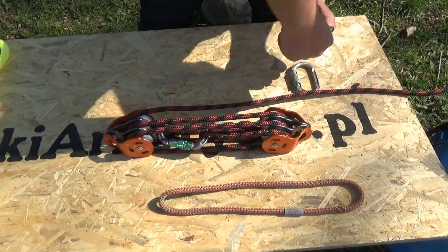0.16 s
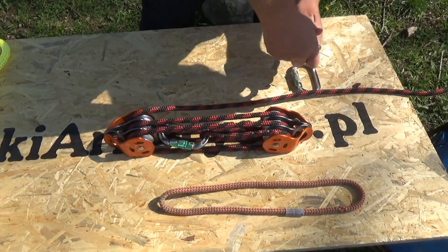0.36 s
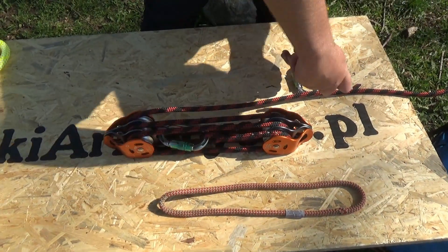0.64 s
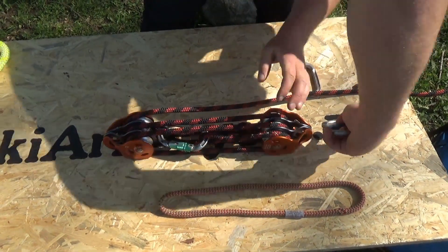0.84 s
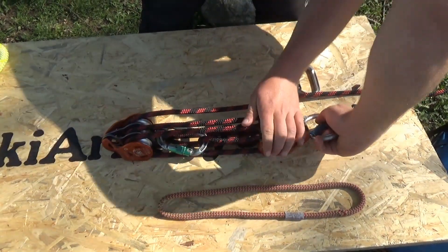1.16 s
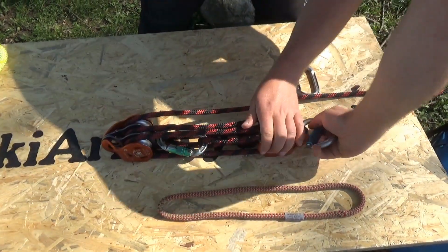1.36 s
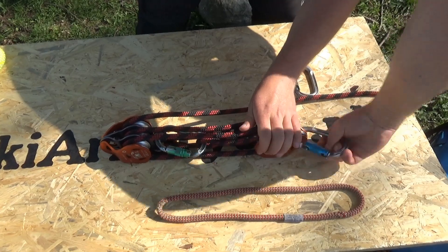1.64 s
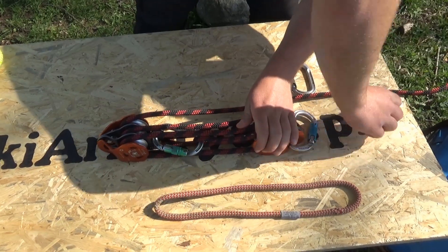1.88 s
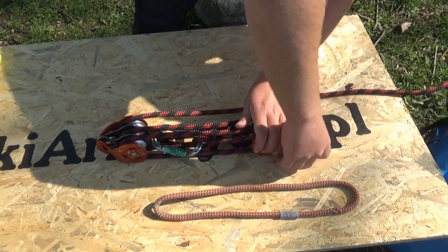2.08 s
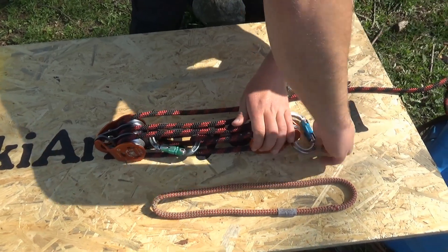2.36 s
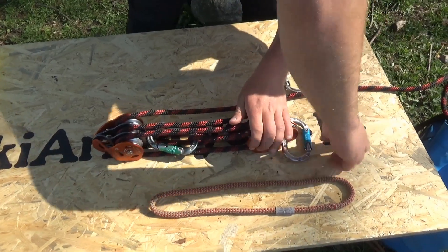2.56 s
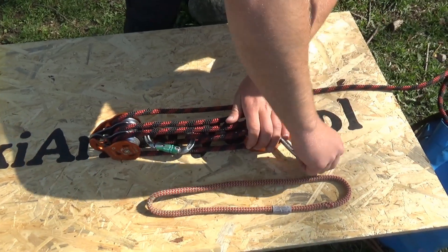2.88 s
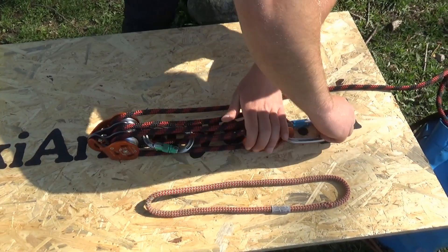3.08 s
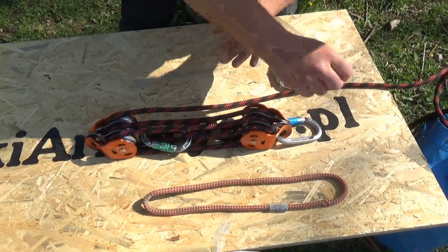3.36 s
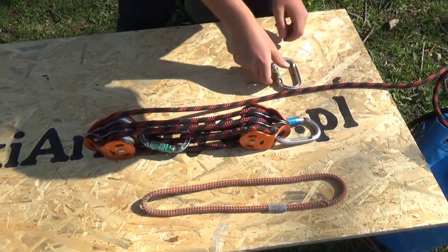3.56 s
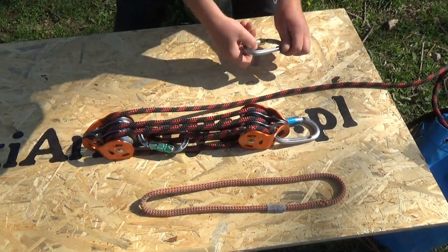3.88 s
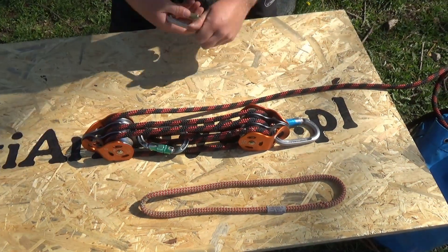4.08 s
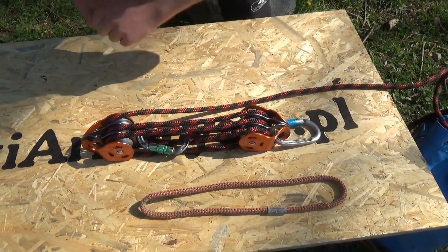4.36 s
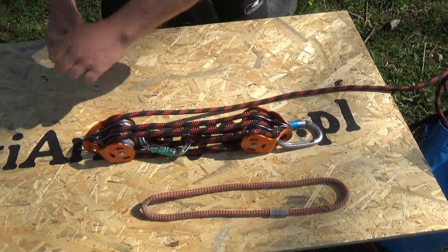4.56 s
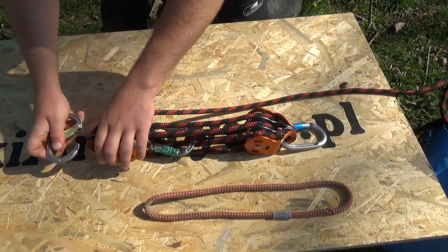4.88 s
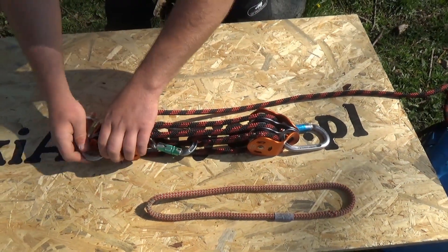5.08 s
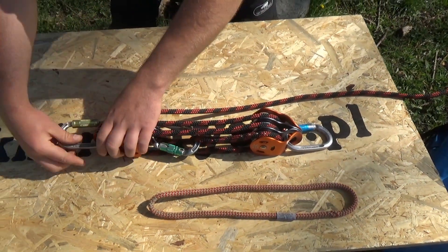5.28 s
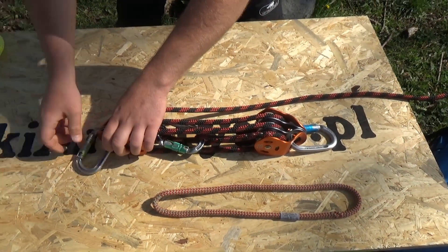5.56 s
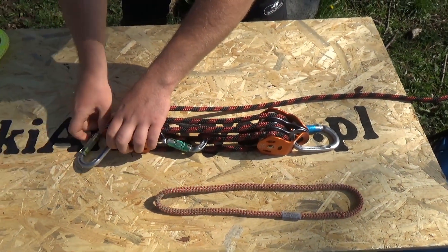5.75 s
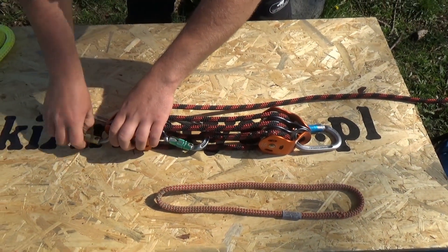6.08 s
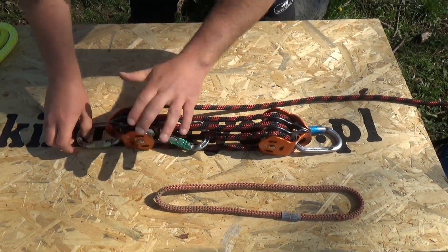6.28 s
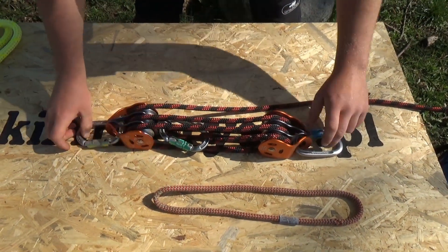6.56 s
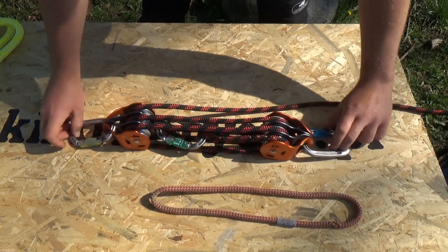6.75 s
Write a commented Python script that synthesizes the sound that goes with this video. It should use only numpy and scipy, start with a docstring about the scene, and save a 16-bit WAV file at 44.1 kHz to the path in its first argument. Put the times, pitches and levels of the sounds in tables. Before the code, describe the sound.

Aluminium carabiners clink and rattle close to the microphone as they are clipped into rope pulleys on a chipboard sheet. After a couple of light snaps comes a busy run of short ringing clicks, woody knocks and gritty scrapes, then a brief lull and a second busy run. Behind it lies a quiet garden with distant hiss, a few faint sparrow chirps and low puffs of wind on the microphone.

```python
"""Two aluminium carabiners clink and scrape as hands clip them into rope pulleys on a chipboard sheet.
Each clink is a rattling crack with a short metal ring; held in the air, it is damped and the gate snaps.
Bumps ring the board with a woody knock, and grit under the sliding gear makes it rumble.
Behind them is a garden: distant hiss, hoarse sparrows, one thin falling whistle,
and wind buffeting the microphone in low puffs."""
import sys
import numpy as np
from scipy import signal
from scipy.fft import rfft, irfft
from scipy.io import wavfile
from scipy.ndimage import uniform_filter1d

SR = 44100
rng = np.random.default_rng(int(sys.argv[2]) if len(sys.argv) > 2 else 0)


def to_wav(sig):
    """Store sig (one row per channel, or 1-D mono) as 16-bit WAV at the path in sys.argv[1].

    Samples outside -1..1 are clipped; the rate is SR.
    """
    pcm = np.clip(np.atleast_2d(sig), -1, 1) * 32767
    pcm = np.round(pcm).astype(np.int16)
    wavfile.write(sys.argv[1], SR, pcm.T)  # frames by channels


N = 305172
TIME = np.arange(N) / SR

# tone of the garden bed: (frequency [Hz], relative level [dB])
GARDEN_SPECTRUM = [(100, -10), (300, 2), (700, 1), (1600, -6), (4000, -4.5), (10000, -11.5), (16000, -19)]
# wind gusts: (peak time [s], level [dB], fade on either side [s])
GUSTS = [(.82, -45, 0.037), (3.55, -48.5, 0.55), (4.098, -32.5, 0.021), (4.598, -44, 0.065),
         (6.1, -44, 0.45), (6.46, -35.5, 0.034)]
# gear dragged over the board or through the fingers:
# (start [s], length [s], metal scrape level [dB], board rumble level [dB])
SLIDES = [(0.103, 0.27, -56, -72), (0.388, 0.1, -58.5, -85), (1.737, 0.15, -45.5, -39),
          (1.781, 0.28, -51.5, -42.5), (2.123, 0.6, -54, -44), (2.422, 0.43, -60.5, -36.5),
          (2.885, 0.2, -54.5, -36.5), (2.966, 0.056, -42.5, -38.5), (3.202, 0.28, -72, -38.5),
          (3.533, 0.19, -58.5, -80), (4.024, 1, -61, -69.5), (5.119, 0.44, -61, -49),
          (5.377, 0.24, -52.5, -51), (5.576, 0.11, -95, -46), (5.78, 0.061, -60.5, -42.5),
          (5.963, 0.16, -58, -40), (6.019, 0.11, -44, -53), (6.086, 0.07, -37.5, -41.5),
          (6.176, 0.51, -68, -50), (6.746, 0.19, -59, -38)]
# carabiner modes before the grip alters them: (frequency [Hz], bandwidth [Hz], relative level [dB])
CARABINER_MODES = [(2100, 90, -7), (2700, 60, -10), (3650, 70, -8), (4170, 55, -4), (5240, 70, -2),
                   (6410, 50, -7), (8250, 40, -12), (9600, 60, -3), (12200, 35, -24), (13550, 45, -27)]
# chipboard modes before the load alters them: (frequency [Hz], bandwidth [Hz], relative level [dB])
BOARD_MODES = [(208.5, 30, 1), (373, 10, -7.5), (479, 48.3, 8.5), (674, 42.4, 6.5), (1094, 99, 3),
               (1441, 62, 4)]
# metal-on-metal hits: (time [s], peak level [dB], brightest pitch [Hz])
CLINKS = [(0.16, -17, 3520), (0.3694, -9, 10870), (0.41, -35, 10200), (1.1394, -9.5, 5070),
          (1.2664, -7.5, 6300), (1.486, -11.5, 5820), (1.5497, -20, 2680), (1.5776, -9, 8600),
          (1.598, -11, 8200), (1.609, -9, 9130), (1.6164, -14.5, 7120), (1.649, -12, 5570),
          (1.68, -12.5, 5280), (1.75, -19.5, 2410), (1.879, -12, 10000), (1.8852, -7.5, 11980),
          (1.91, -11.5, 7130), (1.978, -11.5, 6250), (2.018, -20.5, 3650), (2.071, -16.5, 3720),
          (2.2483, -13.5, 5810), (2.35, -7.5, 9550), (2.58, -13, 5040), (2.915, -14, 6140),
          (2.9422, -7, 4300), (2.971, -12, 9700), (2.9846, -18, 6400), (3.045, -9, 2160),
          (3.235, -11.5, 4950), (3.2828, -12.5, 9320), (3.333, -19, 4900), (4.5534, -16.5, 2620),
          (4.5737, -24.5, 2500), (4.647, -19.5, 9200), (4.6689, -10.5, 3154), (4.786, -35, 2680),
          (5.135, -11.5, 4750), (5.152, -13, 4400), (5.168, -9, 3990), (5.2019, -10, 8220),
          (5.243, -5.5, 4630), (5.265, -23, 4770), (5.3413, -5.5, 5730), (5.3545, -18.5, 11600),
          (5.356, -15, 13500), (5.378, -9.5, 8270), (5.4162, -11, 5920), (5.455, -13.5, 5180),
          (5.4984, -8, 2830), (5.5189, -13, 12550), (5.5303, -14, 5040), (5.587, -6.5, 4940),
          (5.616, -14, 8430), (5.6338, -19.5, 6070), (5.657, -19, 4760), (5.69, -22.5, 5050),
          (5.782, -33.5, 3630), (5.976, -16, 4970), (6.03, -9, 9900), (6.092, -10, 3820),
          (6.0993, -6, 9400), (6.1422, -7, 5440), (6.2639, -17, 4050), (6.311, -8, 9420),
          (6.357, -21, 4380), (6.7732, -18.5, 3500), (6.794, -13, 9500), (6.8, -6, 5200),
          (6.806, -15, 8200)]
# spans with the carabiner held in the air: (start [s], end [s])
IN_AIR = [(0, 1), (4, 5)]
# glide of the thin whistle: (time [s], pitch [Hz])
WHISTLE_GLIDE = [(.2, 13000), (.245, 10900), (.33, 9900)]
# contour of one chirp: (time from its anchor [s], pitch [Hz], relative level [dB])
CHIRP_SHAPE = [(-.035, 6800, -12), (0, 6600, 0), (.011, 4200, -2), (0.03, 4600, 3), (.07, 4200, 0),
               (0.104, 3700, -20)]
# sparrow calls, the lowest from a second, deeper bird: (anchor time [s], level [dB], pitch [ratio])
CHIRPS = [(0.513, -44.5, 0.94), (.575, -51.5, 0.7), (0.89, -42.5, 0.96), (2.654, -41, 0.96),
          (3.254, -37, 0.93), (3.404, -42.5, 0.91), (4.267, -41, 0.96), (5.793, -41, 0.94),
          (6.643, -41, 0.97)]
# gear dropped or bumped on the board: (time [s], peak level [dB])
KNOCKS = [(1.141, -18.5), (1.196, -16), (1.487, -17), (1.8594, -6.5), (1.879, -16.5), (1.938, -18),
          (1.958, -29), (1.975, -9), (2.016, -13.5), (2.07, -11), (2.238, -16), (2.3437, -13),
          (2.45, -17.5), (2.974, -17), (3.129, -10.5), (3.211, -17.5), (3.734, -26.5), (3.841, -18.5),
          (5.498, -9), (5.52, -10.5), (5.641, -11), (5.676, -12), (5.701, -20.5), (5.856, -28),
          (6.272, -7.5), (6.342, -21.5), (6.405, -30), (6.618, -30), (6.686, -30), (6.857, -36)]
# hands moving across the board: (time [s], left minus right [dB])
HAND_PAN = [(4.3, -1), (4.6, 1.8), (6.4, 1.6), (6.7, -.7)]
# stereo side signal, left row then right: (polarity [sign])
SIDE = np.array([[1], [-1]])


def undb(db):
    """Decibels to gain."""
    return 10 ** (np.asarray(db) / 20)


def unit(x):
    """Normalise to rms 1."""
    return x / np.sqrt(np.mean(x ** 2))


def band(x, lo_hz, hi_hz, order=2):
    """Butterworth band-pass."""
    sos = signal.butter(order, [lo_hz, min(hi_hz, .45 * SR)], "band", fs=SR, output="sos")
    return signal.sosfilt(sos, x)


def drift(rate_hz):
    """Smooth random modulation with a spread of 1."""
    step = int(SR / rate_hz)
    x = uniform_filter1d(np.repeat(rng.standard_normal(N // step + 1), step), step)[:N]
    return x / x.std()


def add(track, start_s, sound):
    """Mix a sound in at its cue."""
    i = int(start_s * SR)
    track[i:i + len(sound)] += sound[:N - i]


def ring(modes, weight, phase_turns, t):
    """A struck body rings as decaying sines, each with its own weight and starting phase."""
    hz, width_hz, db = np.transpose(modes)[:, :, None]
    envelopes = weight[:, None] * undb(db) * np.exp(-np.pi * width_hz * t)
    return np.sum(envelopes * np.sin(2 * np.pi * (hz * t + phase_turns[:, None])), axis=0)


def loaded(modes, detune):
    """A grip or load detunes each mode a little and adds its own damping."""
    tuning, damping = rng.random((2, len(modes)))
    factors = np.stack([1 + detune * (2 * tuning - 1), 1.11 + damping, np.ones(len(modes))], axis=1)
    return np.array(modes) * factors


def in_air(time_s):
    """True while the carabiner is held clear of the board."""
    return any(start < time_s < end for start, end in IN_AIR)


def garden(level_db=-54.5, side_db=-6):
    """A steady, wide bed of distant hiss and hum."""
    hz = np.maximum(np.fft.rfftfreq(N, 1 / SR), 1)
    curve_hz, curve_db = np.transpose(GARDEN_SPECTRUM)
    tone = undb(np.interp(np.log(hz), np.log(curve_hz), curve_db))
    mid, side = irfft(rfft(rng.standard_normal((2, N))) * tone, N)
    return undb(level_db) * unit(mid + undb(side_db) * side * SIDE)


def wind(calm_db=-63.5, side_db=-12, flap_db=-5):
    """Wind buffets the microphone in uneven low puffs, with a higher flap on top."""
    noise = rng.standard_normal((2, N))
    mid, side = unit(band(noise, 32, 100.6)) + undb(flap_db) * unit(band(noise, 86.4, 165))
    puffs = undb(3 * drift(14))
    gusts = sum(undb(db) * np.exp(-np.abs(TIME - s) / fade_s) for s, db, fade_s in GUSTS)
    return (undb(calm_db) + gusts) * puffs * (mid + undb(side_db) * side * SIDE)


def grit(per_s, scatter_db):
    """Rough faces catch on each other in sparse clicks of very unequal size."""
    clicks = (rng.random(N) < per_s / SR) * rng.standard_normal(N)
    return clicks * undb(scatter_db * np.minimum(rng.exponential(size=N), 4))


def strokes(press_share=.059, lift_share=.84, skid_s=.1, skid_fade_s=.025):
    """Each slide, and the skid after each blow, as (start [s], pressure, scrape [dB], rumble [dB])."""
    out = []
    for start, length, metal_db, board_db in SLIDES:
        progress = np.arange(int(length * SR)) / (length * SR)
        pressure = np.interp(progress, [0, press_share, 1 - lift_share, 1], [0, 1, 1, 0]) ** 2
        out.append((start, pressure, metal_db, board_db))
    skid = np.exp(-TIME[:int(skid_s * SR)] / skid_fade_s)
    for blows, metal_db, board_db in ((CLINKS, -53, -45.5), (KNOCKS, -58, -30)):  # relative to the blow
        for start, db, *_ in blows:
            out.append((start, skid, db + metal_db, -120 if in_air(start) else db + board_db))
    return out


def scrapes(sing_db=4, rasp_db=-12, finger_damping=7, board_damping=2.5):
    """Grit under moving gear excites metal and board; each stroke finds a new spot and mix of modes."""
    out, t = np.zeros(N), TIME[:SR // 20]
    fine = grit(5000, 3.3) * undb(2.8 * drift(90))
    coarse = grit(1500, 2.5) * undb(3 * drift(40))
    textures = fine, coarse, band(fine, 1580, 9700, order=3), band(fine, 840, 3840)
    board_modes = np.array(BOARD_MODES) * [1, board_damping, 1]
    for start, pressure, metal_db, board_db in strokes():
        force = np.pad(pressure, (0, len(t)))  # room for the ring-out
        i, n = int(start * SR), len(force)
        scratch, rub, hiss, rasp = (np.resize(x[i:], n) * force for x in textures)
        modes = loaded(CARABINER_MODES, detune=.05) * [1, finger_damping, 1]
        metal_ring = ring(modes, .31 + rng.random(len(modes)), np.zeros(len(modes)), t)
        board_ring = ring(board_modes, .11 + rng.random(len(board_modes)), np.zeros(len(board_modes)), t)
        sing = signal.fftconvolve(scratch, metal_ring)[:n]
        rumble = signal.fftconvolve(rub, board_ring)[:n]
        metal = unit(hiss) + undb(sing_db) * unit(sing) * (board_db > -60)  # a light touch only rustles
        board = unit(band(rumble, 164, 1285)) + undb(rasp_db) * unit(rasp)
        add(out, start, (undb(metal_db) * metal + undb(board_db) * board) * np.sqrt(n / len(pressure)))
    return out


def clinks(ring_db=-1.5, bright_db=-2, wide_db=-3, crack_t60_s=.012, gate_hz=2350, gate_db=4):
    """Metal hits metal: a rattling crack, then a ring led by one mode pulled to the brightest pitch."""
    out, t = np.zeros(N), TIME[:SR // 8]
    for start, db, hz in CLINKS:
        modes = loaded(CARABINER_MODES, detune=.02)
        nearest = np.argmin(np.abs(np.log(modes[:, 0] / hz)))
        modes[nearest, ::2] = hz, bright_db
        chatter_s = .0033 * np.sqrt(2 * undb(db))  # harder blows chatter longer
        burst = rng.standard_normal(len(t)) * undb(-60 * np.maximum(t - chatter_s, 0) / crack_t60_s)
        crack = band(burst, hz / 1.135, hz * 1.09) + undb(wide_db) * band(burst, 1490, 9070, order=3)
        if in_air(start):
            crack += undb(gate_db) * band(burst, gate_hz / 1.15, gate_hz * 1.4)  # hollow gate snap
            modes[:, 1] *= 4  # fingers damp the ring
        strength, polarity = rng.random((2, len(modes)))
        weight = 1.22 * strength ** 2
        weight[nearest] = 1
        hit = crack / np.abs(crack).max() + undb(ring_db) * ring(modes, weight, np.round(polarity) / 2, t)
        add(out, start, undb(db) * hit / np.abs(hit).max())
    return out


def whistle(level_db=-63, waver=.012):
    """A faint, thin tone that falls, unsteady in pitch and level."""
    times, hz = np.transpose(WHISTLE_GLIDE)
    pitch = np.interp(TIME, times, hz) * (1 + waver * drift(300))
    envelope = undb(level_db + 4 * drift(60)) * (times[0] < TIME) * (TIME < times[-1])
    return np.sin(2 * np.pi * np.cumsum(pitch) / SR) * envelope


def sparrows(warble=.05, trim_db=-3, echo_fade_s=.04):
    """Hoarse, warbling chirps, smeared by echoes from nearby walls and trees."""
    calls = np.zeros(N)
    times, hz, db = np.transpose(CHIRP_SHAPE)
    t = TIME[:SR // 7] + times[0]
    for anchor, level_db, ratio in CHIRPS:
        pitch = ratio * np.interp(t, times, hz) * (1 + warble * drift(300)[:len(t)])
        envelope = undb(level_db + np.interp(t, times, db, -120, -120))
        add(calls, anchor + times[0], np.sin(2 * np.pi * np.cumsum(pitch) / SR) * envelope)
    calls *= undb(4 * drift(700))  # fast flutter makes the voice hoarse
    tail = rng.standard_normal(SR // 3) * np.exp(-TIME[:SR // 3] / echo_fade_s)
    echoes = signal.fftconvolve(calls, tail / np.linalg.norm(tail))[:N]
    return undb(trim_db) * (calls + echoes)


def knocks(attack_s=.00016):
    """Each bump rings a new mix of board modes through a soft push; the load on the board shifts them."""
    out, t = np.zeros(N), TIME[:SR // 8]
    for start, db in KNOCKS:
        strength, phase = rng.random((2, len(BOARD_MODES)))
        body = ring(loaded(BOARD_MODES, detune=.049), .39 + strength, phase, t)
        attack = 1 - np.exp(-t / attack_s)
        hit = band(body * attack, 110, 600 + 9000 * undb(db))  # harder blows clack brighter
        add(out, start, undb(db) * hit / np.abs(hit).max())
    return out


def reflections(gear):
    """A short bloom of echoes, opposite in left and right, widens the gear."""
    t = TIME[:SR // 20]
    bloom = band(rng.standard_normal(len(t)), 800, 16000, order=1) * t ** 2 * np.exp(-t / .003) * SIDE
    return signal.fftconvolve(gear[None], bloom / np.linalg.norm(bloom), axes=1)[:, :N]


def scene(wet_db=-13.5):
    """The gear up front, panned with the hands; birds a little to the right; garden and wind all round."""
    gear = clinks() + knocks() + scrapes()
    pan_db = np.interp(TIME, *np.transpose(HAND_PAN))
    foreground = gear * undb(SIDE * pan_db / 2) + undb(wet_db) * reflections(gear)
    birds = (sparrows() + whistle()) * undb(-1.5 * SIDE)
    return foreground + birds + garden() + wind()


def record(dry, ceiling=.55, top_hz=15800):
    """Soft saturation rounds the loudest peaks and a steep low-pass takes off the top."""
    rounded = ceiling * np.tanh(dry / ceiling)
    return signal.sosfilt(signal.ellip(8, .2, 70, top_hz, fs=SR, output="sos"), rounded)


dry = scene()
out = record(dry)
to_wav(out)
```